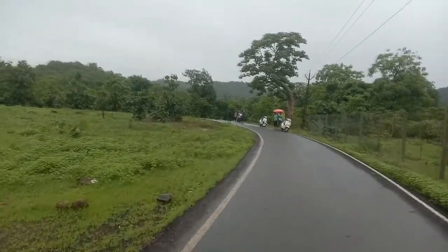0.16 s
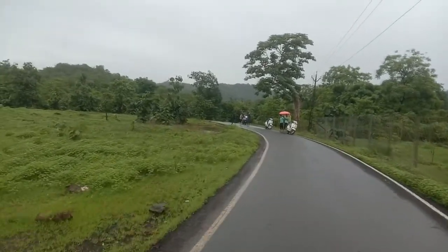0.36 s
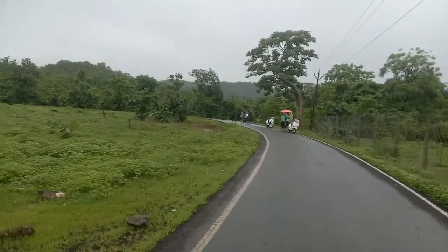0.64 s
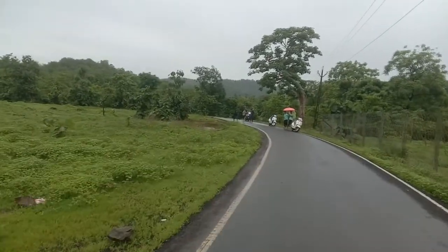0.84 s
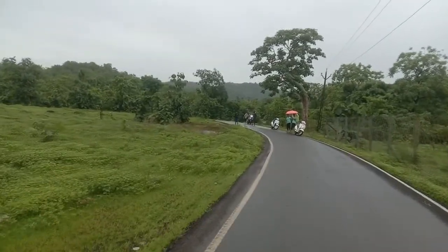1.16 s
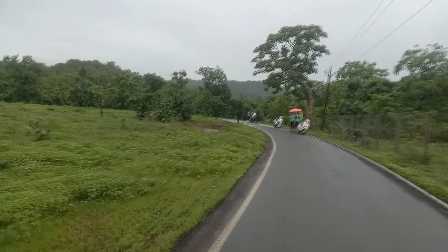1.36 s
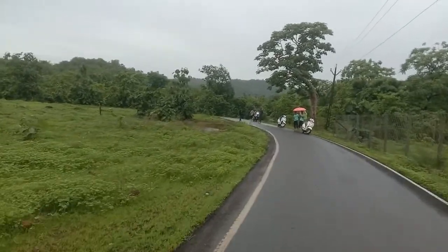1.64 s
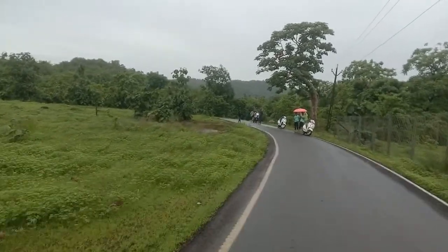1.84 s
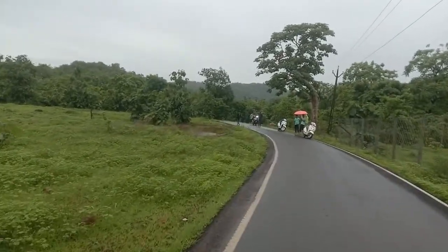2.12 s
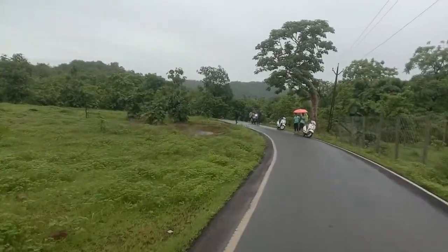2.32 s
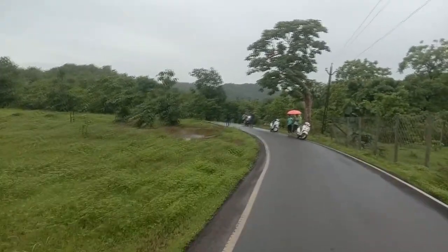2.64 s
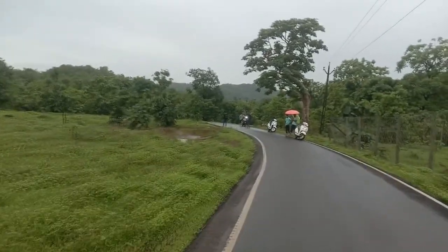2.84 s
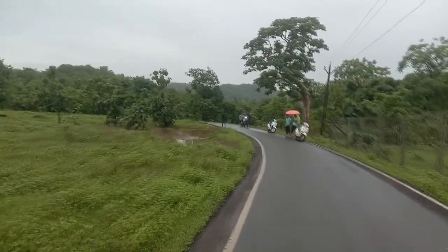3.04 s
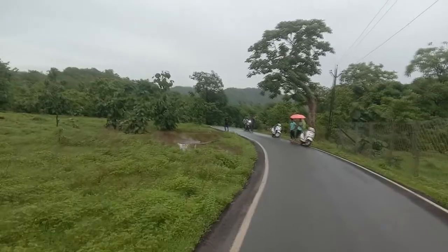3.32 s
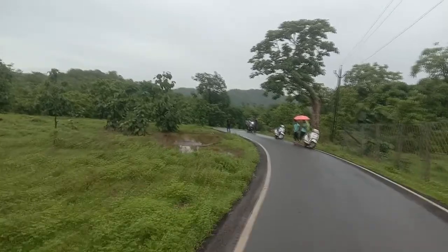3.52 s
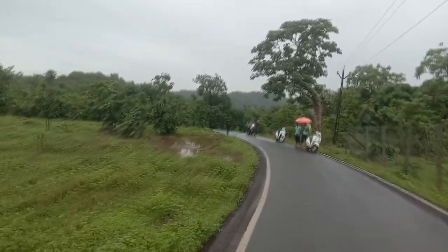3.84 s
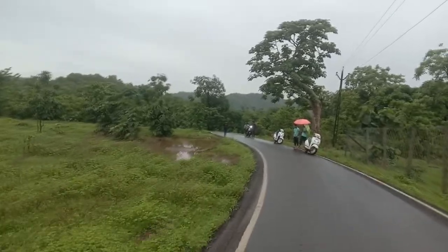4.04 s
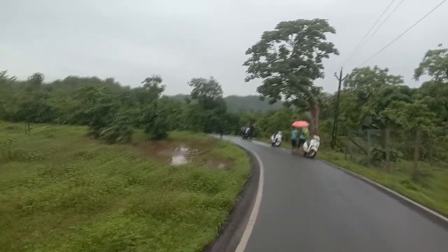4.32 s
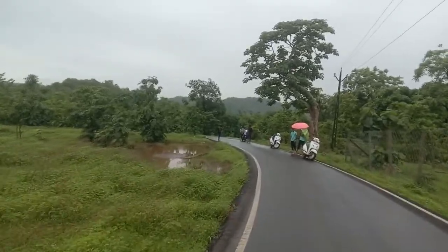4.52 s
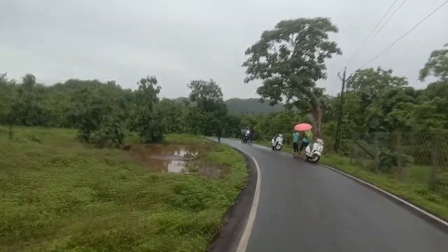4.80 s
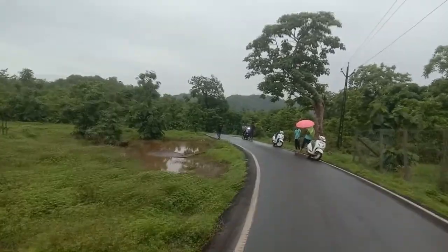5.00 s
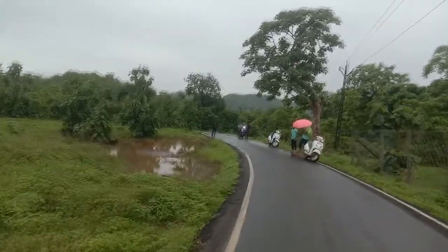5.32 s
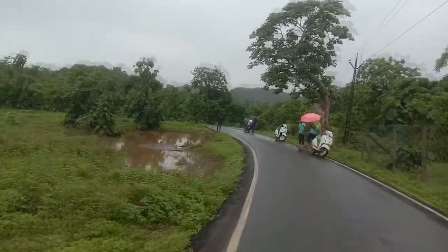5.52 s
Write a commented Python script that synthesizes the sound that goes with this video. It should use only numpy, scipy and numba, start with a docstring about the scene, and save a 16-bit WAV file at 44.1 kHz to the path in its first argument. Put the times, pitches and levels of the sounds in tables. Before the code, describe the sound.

Dull, fast chugging of a single-cylinder motorbike on board, with low wind buffeting early, one brief burst midway and violent gusts late.

```python
"""A single-cylinder four-stroke motorbike rolls slowly along a road, heard by a small camera on board.
Some 14.6 times a second, blows ring the engine case over a whirr of filtered noise with body resonances.
Noise and single slaps of wind buffet the port for the first 1.6 s, and briefly again near 2.9 s; the
strongest gusts come from 4.6 s to 5.3 s, as the drone swells; then the engine slows until the sound stops.
Throughout, the camera's gain control pulls the engine down under the gusts."""
import sys
import numpy as np
from scipy import signal
from scipy.fft import rfft, irfft, next_fast_len
from scipy.io import wavfile
from scipy.ndimage import uniform_filter1d, map_coordinates
from numba import njit

SR = 44100
rng = np.random.default_rng(int(sys.argv[2]) if len(sys.argv) > 2 else 0)


def transcribe(u):
    """Save the signal u as a 16-bit wav file named by the first command-line argument.

    u: samples, shape (n,) or (channels, n), limited to [-1, 1]; the rate is SR.
    q: integer samples, one column per channel.
    """
    v = np.clip(np.atleast_2d(u).T, -1, 1)
    q = np.round(v * 32767).astype(np.int16)
    wavfile.write(sys.argv[1], SR, q)


N = 249606  # length in samples

# Engine speed. Each row: time in s, four-stroke cycles per s.
ENGINE_SPEED = [(0, 14.573), (.9, 14.492), (2.7, 14.71), (3.6, 14.843), (4.2, 14.802), (4.75, 15.12),
                (5.1, 14.796), (5.66, 13.539)]
START_CYCLE = .006  # share of a cycle already run at the start

# Modes of the engine case. Each row: frequency in Hz, relative level in dB, 60 dB decay time in s.
CASE_MODES = [(497, 2, .1), (622, -1, .11), (1048, 1, .06), (1200, -1, .05), (1487, 0, .04),
              (1620, -.5, .032), (1743, 1.5, .027), (1930, -4, .05), (2215, -6, .04), (2490, -5, .05),
              (2850, -1.5, .05), (3050, -4, .025), (3390, -4, .03), (3460, -3, .035), (3680, -3, .025),
              (4220, 1, .026), (4500, -2, .015), (4790, 1.5, .028), (4930, 0, .022), (5080, 0, .022),
              (5230, 0, .025), (5350, 0, .025), (5500, -1, .025), (5740, -2, .02), (6000, -3, .015),
              (7250, 2, .015), (7450, 5, .018), (7680, 7, .018)]
# Blows within one cycle. Each row: place as a share of the cycle, relative level in dB, colour centre in Hz,
# colour width in octaves, rattle decay in s, rattle share of the energy (0-1).
BLOWS = [(.575, -3, 2600, .6, .003, .4), (.59, -1, 4200, .08, .003, .3), (.58, -5, 4900, .2, .004, .6),
         (.67, 0, 5200, .25, .007, .7), (.69, 0, 1540, .15, .003, .15), (.75, -5, 2600, .15, .003, .3),
         (.82, -3, 1480, .08, .003, .2), (.62, -7, 1100, .25, .003, .3), (.945, 2, 1700, .13, .003, .05),
         (.95, 1, 3100, .3, .004, .4), (.94, -6, 4200, .1, .003, .4), (.0, -7, 7300, .25, .006, .9),
         (.04, -4, 1120, .2, .003, .3), (.97, -2, 2400, .22, .004, .4), (.06, -2, 2300, .25, .005, .4),
         (.12, -6, 550, .25, .005, .2)]
TICK_DB, GRIND_DB = -1, -4.5  # rms of the blows and of the steady grind, relative to each other
RISE_S = .001  # time constant of a ring's onset
SCATTER_DB, SLACK_S = .8, .0004  # random spread of blow level and of timing
RING_WOBBLE_S = .00006  # slight random pitch wavering of the rings and grind

# Noise of gears, chain and tyres. Each row: frequency in Hz, relative density in dB per Hz.
WHIRR_SPECTRUM = [(150, -18.5), (300, -3.5), (450, -7), (600, -5), (800, 1.5), (1300, 0), (2000, 2),
                  (3000, -4), (5000, -0.5), (7800, -24.5)]
# Resonances of the body. Each row: frequency in Hz, width in Hz, relative level in dB.
BODY_MODES = [(388.6, 22, -10), (510.6, 17, -10), (617.5, 45, -3.5), (1480, 49, -16.5), (1750, 280, -13),
              (2963, 360, -8.5)]
# Valve openings that let gas rush. Each row: share of the cycle, relative level in dB, fade as a share of it.
GAS_RUSH = [(.57, 1, .2), (.93, 0, .17)]
WHIRR_DB, RUSH_DB = -.5, -3  # gain of the whole whirr; rms of the rush envelope

# Engine level before the gain control. Each row: time in s, clatter above 750 Hz in dB,
# drone below it in dB, treble above 3.2 kHz in dB.
ENGINE_LEVEL = [(0, -33.5, -32.5, -34), (.9, -33, -32, -34), (1.5, -32.5, -31, -33.5), (2.0, -32, -32, -32),
                (3.0, -32.5, -33, -33), (3.7, -32, -33.5, -31), (4.3, -31.5, -33.5, -33),
                (4.9, -33, -30.5, -32.5), (5.3, -33.5, -25.5, -35), (5.66, -31.5, -33, -31.5)]

# Wind before the port limit. Each row: time in s, rumble level in dB, flutter level in dB.
WIND_LEVEL = [(0, -29.5, -35), (.22, -28.5, -39), (.32, -24, -29.5), (.9, -24.5, -32.5), (1.3, -19.5, -27),
              (1.7, -26, -33.5), (2.2, -28, -37), (2.65, -26, -35.5), (2.77, -22.5, -28.5),
              (2.84, -29, -33), (2.9, -19.5, -20), (3.0, -26.5, -34.5), (3.45, -24, -35), (3.9, -28, -30.5),
              (4.2, -26, -34), (4.55, -17.5, -25), (4.65, -17.5, -19), (4.76, -14.5, -23), (4.83, -21, -20),
              (5.0, -23, -26), (5.04, -15, -16.5), (5.12, -21, -23.5), (5.22, -21, -17), (5.3, -21, -24.5),
              (5.66, -21.5, -25)]
# Slaps of air before the port limit. Each row: start in s, peak level in dB, centre frequency in Hz.
SLAPS = [(0.108, -23, 400), (0.282, -12, 74.3), (0.354, -14, 110), (0.398, -14.5, 66.7),
         (0.472, -12.5, 190), (0.512, -13.5, 59.6), (0.577, -5.5, 64), (0.612, -15, 88.5),
         (0.635, -13, 174), (0.839, -12.5, 59.9), (0.718, -16.5, 60.6), (0.758, -18.5, 163),
         (0.795, -13.5, 65.7), (0.857, -11, 71.1), (0.984, -17, 70), (1.043, -14.5, 64.7),
         (1.079, -25, 159), (1.136, -10, 61), (1.209, -12, 147), (1.232, -7, 64.6), (1.316, -10, 61.5),
         (1.37, -19, 71), (1.446, -14, 65.6), (1.493, -10.5, 70.4), (1.498, -14, 191), (1.549, -19.5, 247),
         (1.897, -23, 615), (1.859, -22, 87.5), (2.767, -18.5, 77.4), (2.867, -8, 262),
         (2.742, -14.5, 78.1), (2.752, -19, 300), (2.855, -10, 83.6), (2.895, -13.5, 65),
         (2.917, -14.5, 73.7), (2.943, -16, 105.4), (4.251, -12.5, 68.2), (4.414, -18.5, 147.4),
         (4.433, -17, 65.2), (4.493, -17.5, 163), (4.539, -12.5, 71), (4.622, -9.5, 265),
         (4.632, -9.5, 55.6), (4.719, -9.5, 60.4), (4.825, -12.5, 217), (4.857, -9, 57),
         (4.949, -4.5, 66.5), (4.928, -16, 330), (4.988, -23.5, 150), (5.03, -18, 400), (5.084, -1, 63.3),
         (5.105, -7, 60), (5.145, -7, 69.7), (5.186, -14, 178), (5.052, -17.5, 260), (5.208, -15.5, 206),
         (5.212, -12.5, 593), (5.22, -4.5, 308), (5.234, -3.5, 82.3), (5.342, -14.5, 89.8),
         (5.35, -18, 261), (5.423, -16, 74.4), (5.482, -14, 62), (5.612, -15, 75), (5.446, -21.5, 179.5),
         (5.564, -13, 58.5)]
SLAP_CYCLES = 0.46  # Gaussian half width of a slap, in its own cycles
PORT_LIMIT_DB = -2.5  # the strongest swings of air flatten here

# Response of the microphone behind its cover. Each row: frequency in Hz, gain in dB.
MIC_RESPONSE = [(15, -13.5), (25, -10.5), (33, 4.5), (50, 4.5), (2900, -2.5), (3150, -8), (3330, -15.5),
                (3700, -17.5), (3980, -25.5), (4250, -22.5), (5400, -29), (6000, -33), (6650, -42),
                (7600, -30.5)]
THRESHOLD_DB, RATIO = -16.5, 1.93  # gain control
ATTACK_S, RELEASE_S, AHEAD_S = 0.0056, .065, 0.016  # its time constants and how far it looks ahead
TOP_HZ, FADE_S = 7740, .006  # upper cutoff; length of the final fade


def ticks(cycle):
    """Modal excitation: each blow, a clean knock plus a loose rattle, rings the modes near its colour."""
    hz, db, t60 = np.transpose(CASE_MODES)[:, :, None]
    t = np.arange(SR // 8) / SR
    swell = 1 - np.exp(-t / RISE_S)  # the knock spreads through the casting
    decay = undb(db - 60 * t / t60) / np.sqrt(t60)
    rings = decay * swell * np.sin(2 * np.pi * (hz * t + rng.random(hz.shape)))
    blows = np.zeros(N)
    last = int(cycle[-1])
    slack = rng.standard_normal(last + 2)  # all blows of a cycle come early or late together
    for share, blow_db, centre_hz, octaves, rattle_s, loose in BLOWS:
        at = np.interp(np.arange(-1, last + 1) + share, cycle, np.arange(N), left=-N, right=-N)
        size_db = SCATTER_DB * rng.standard_normal(len(at))
        at = (at + SLACK_S * SR * slack).astype(int)
        inside = (at >= 0) & (at < N)
        knock = np.zeros(N)
        knock[at[inside]] = undb(size_db[inside])
        fade = np.exp(-t / rattle_s)
        rattle_envelope = signal.fftconvolve(knock, fade / np.linalg.norm(fade))[:N]
        rattle = rattle_envelope * rng.standard_normal(N)
        push = np.sqrt(1 - loose) * knock + np.sqrt(loose) * rattle
        weight = np.exp(-.5 * (np.log2(hz / centre_hz) / octaves) ** 2)
        blows += undb(blow_db) * signal.fftconvolve(push, (weight * rings).sum(axis=0))[:N]
    # gears shake the case between blows
    grind = signal.fftconvolve(rng.standard_normal(N), rings.sum(axis=0))[:N]
    return wobble(level(blows, TICK_DB) + level(grind, GRIND_DB), RING_WOBBLE_S, 30)


def whirr(cycle):
    """Broadband friction and flow noise: treble jumps as a valve opens, then fades; resonances waver."""
    broad = level(colour(rng.standard_normal(N), WHIRR_SPECTRUM), 0)
    # the steady part, leaving the rest of the treble to the gas rush
    low = colour(broad, [(700, -1), (1200, -3), (1600, -3.5), (2400, -5), (3000, -3), (3500, -8),
                         (4500, -10), (5600, -9), (7000, -6)])
    high = broad - low
    top = colour(high, [(3200, -40), (3500, 0)])
    # the two treble bands flicker independently
    high = (high - top) * undb(1.6 * walk(30)) + top * undb(1.6 * walk(30))
    rush = sum(undb(db) * np.exp(-((cycle - share) % 1) / fade) for share, db, fade in GAS_RUSH)
    rush = level(uniform_filter1d(rush, SR // 400), RUSH_DB)
    high = high * rush * undb(.8 * walk(25))
    body = np.zeros(N)
    for hz, width_hz, db in BODY_MODES:
        gain = undb(db + 0.87 * walk(18))
        body += gain * wobble(band(hz, width_hz), 0.000594, 9)
    return undb(WHIRR_DB) * (low + high + body)


def wind():
    """Turbulent pressure: eddies at the port give deep rumble, faster flutter in puffs, and single slaps."""
    rumble_db, flutter_db = curve(WIND_LEVEL)
    rumble = colour(rng.standard_normal(N), [(20, 0.5), (40, 3.5), (65, 4.0), (100, 1.0), (150, -13.5),
                                             (300, -30.0)])
    flutter = colour(rng.standard_normal(N), [(80, -15), (130, 0.5), (200, -3.5), (320, -8.5),
                                              (500, -15.5), (700, -24.0), (1200, -46.0)])
    # each pressure swing of the rumble throws a burst of flutter
    puffs = flutter * undb(1.8 * walk(40)) * (1.3 + np.abs(level(rumble, 0)))
    air = steady(rumble, 0.082) * undb(1.5 * walk(18)) * undb(rumble_db)
    air = air + steady(puffs, 0.076) * undb(flutter_db)
    for (start_s, db, hz), turn in zip(SLAPS, rng.random(len(SLAPS))):
        at = int(start_s * SR) + np.arange(-SR // 20, SR // 12)
        cycles = (at / SR - start_s) * hz - .55  # the slap centres 0.55 cycle after its start
        bump = np.exp(-.5 * (cycles / SLAP_CYCLES) ** 2)
        slap = undb(db) * bump * np.cos(2 * np.pi * (cycles + turn))
        np.add.at(air, np.clip(at, 0, N - 1), slap)
    limit = undb(PORT_LIMIT_DB)
    return limit * np.tanh(air / limit)


def undb(db):
    """Logarithmic scale: amplitude factor of a level in dB."""
    return 10 ** (np.asarray(db) / 20)


def level(x, db):
    """Normalisation: scale a signal to an rms level in dB."""
    return x * undb(db) / np.sqrt(np.mean(x ** 2))


def curve(table):
    """Linear interpolation: the columns after the time column, one value a sample."""
    s, *columns = np.transpose(table)
    return [np.interp(np.arange(N) / SR, s, c) for c in columns]


def colour(x, points):
    """Zero-phase filtering: weight the spectrum by (Hz, dB) points joined over log frequency."""
    hz, db = np.transpose(points)
    pad = SR // 5
    size = next_fast_len(len(x) + 2 * pad)
    bins_hz = np.arange(size // 2 + 1) * SR / size + 1  # 1 Hz up, so the log stays finite
    gain = undb(np.interp(np.log(bins_hz), np.log(hz), db))
    padded = np.pad(x, pad, "reflect", reflect_type="odd")
    return irfft(rfft(padded, size) * gain, size)[pad:pad + len(x)]


def band(hz, width_hz):
    """Resonance: noise through a single peak, rms 1."""
    b, a = signal.iirpeak(hz, hz / width_hz, fs=SR)
    return level(signal.lfilter(b, a, rng.standard_normal(N)), 0)


def walk(rate):
    """Smoothed random steps: values held 1 / rate s and slewed twice; spread near 1."""
    k = int(SR / rate)
    steps = np.repeat(rng.standard_normal(N // k + 1), k)
    return 1.368 * uniform_filter1d(uniform_filter1d(steps, k), k)[:N]


def wobble(x, seconds, rate):
    """Phase modulation: read the sound at a randomly wavering place, so that its resonances waver."""
    place = np.arange(N) + seconds * SR * walk(rate)
    return map_coordinates(x, [place], order=1, mode="mirror")


def steady(x, seconds):
    """Power levelling: even out the swells longer than the given seconds; rms near 1."""
    k = int(seconds * SR)
    power = uniform_filter1d(uniform_filter1d(x ** 2, k), k)
    return x / np.sqrt(power + 1e-18)


@njit
def follow(size, attack, release):
    """Envelope detection: one-pole smoothing that rises fast and falls slowly."""
    out, e = np.empty(len(size)), 0.
    for i in range(len(size)):
        e += (size[i] - e) * (attack if size[i] > e else release)
        out[i] = e
    return out


def scene():
    """Superposition: the engine, levelled in three bands, plus the wind."""
    cycle = START_CYCLE + np.cumsum(curve(ENGINE_SPEED)[0]) / SR
    clatter_db, drone_db, treble_db = curve(ENGINE_LEVEL)
    engine = ticks(cycle) + whirr(cycle)
    drone = colour(engine, [(720, -3.0), (800, -50.0)])
    treble = colour(engine, [(3150, -45), (3300, 0)])
    clatter = engine - drone - treble
    engine = undb(drone_db) * drone + undb(clatter_db) * clatter + undb(treble_db) * treble
    return (engine + wind())[None]


def record(dry):
    """Compression: the cover dulls the treble, loud moments are turned down, and the top is cut."""
    heard = colour(dry[0], MIC_RESPONSE)
    ahead = np.roll(np.abs(heard), -int(AHEAD_S * SR))
    envelope = follow(ahead, 1 / (ATTACK_S * SR), 1 / (RELEASE_S * SR))
    over = np.maximum(envelope / undb(THRESHOLD_DB), 1)
    heard = (heard * over ** (1 / RATIO - 1))[None]
    top_cut = signal.ellip(16, .3, 70, TOP_HZ, fs=SR, output="sos")
    fade = np.minimum((N - 1 - np.arange(N)) / (FADE_S * SR), 1)  # short fade to silence over the last 6 ms
    return signal.sosfilt(top_cut, heard) * fade


dry = scene()
out = record(dry)
transcribe(out)
```